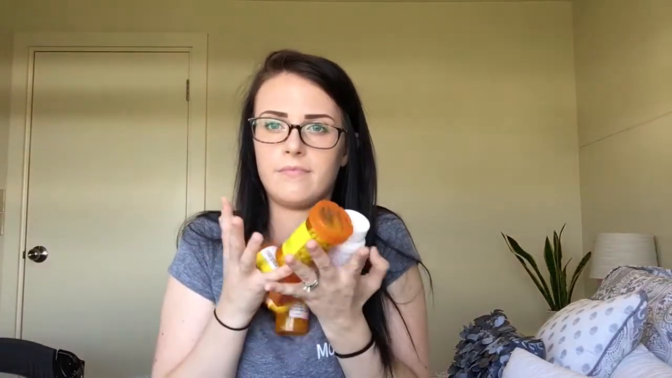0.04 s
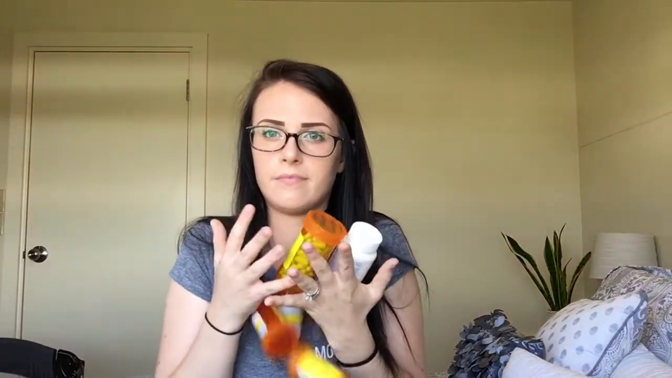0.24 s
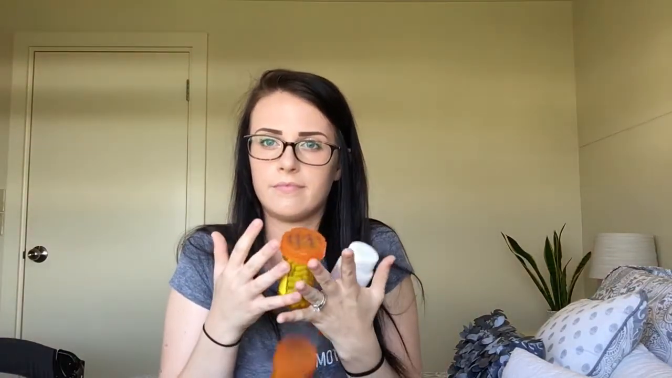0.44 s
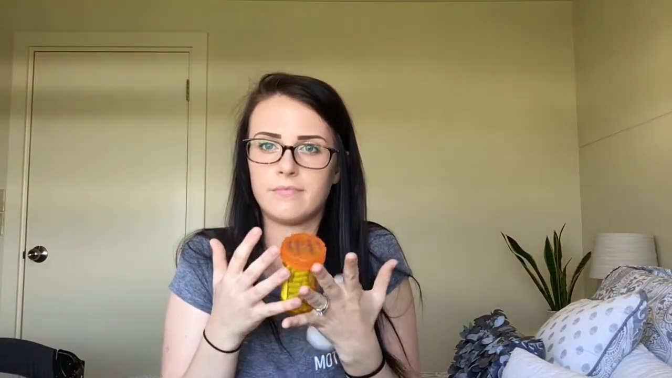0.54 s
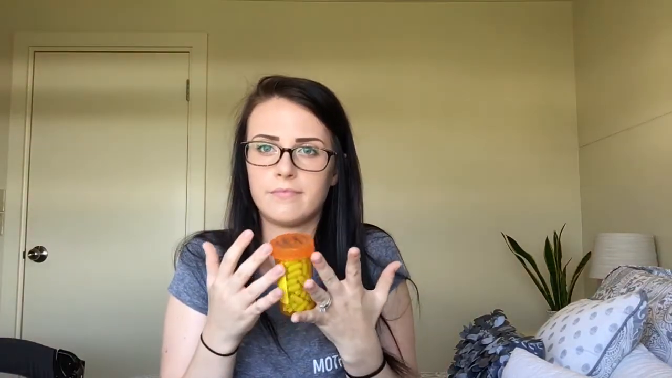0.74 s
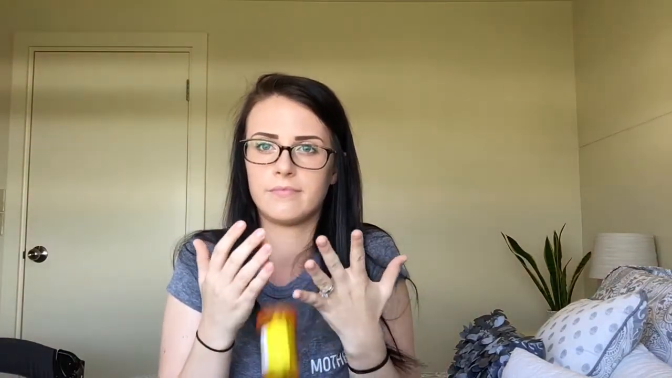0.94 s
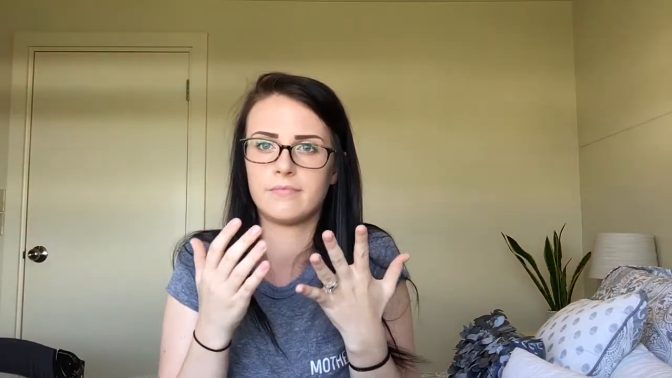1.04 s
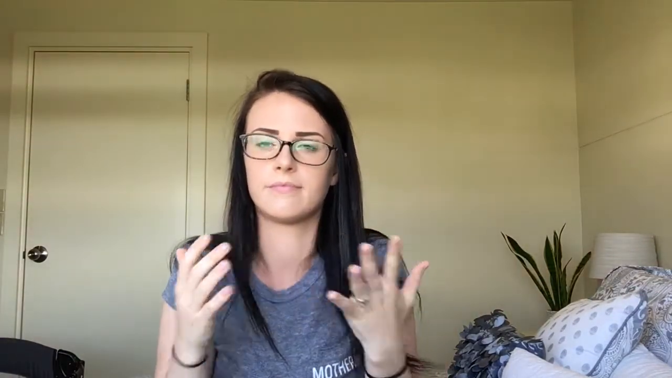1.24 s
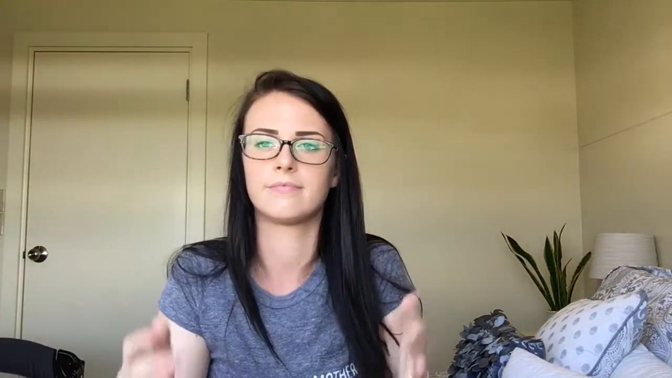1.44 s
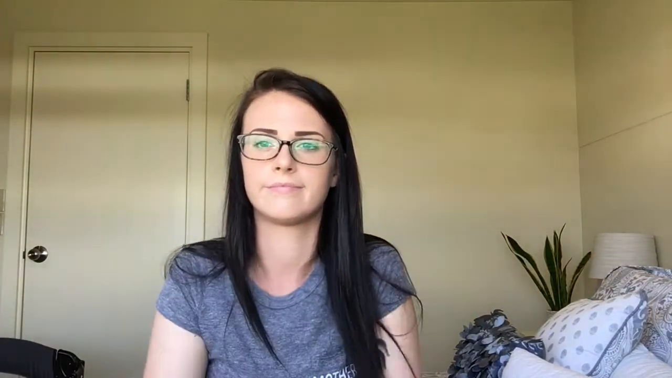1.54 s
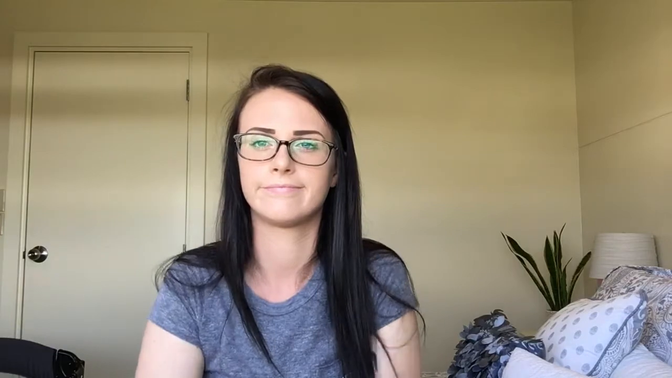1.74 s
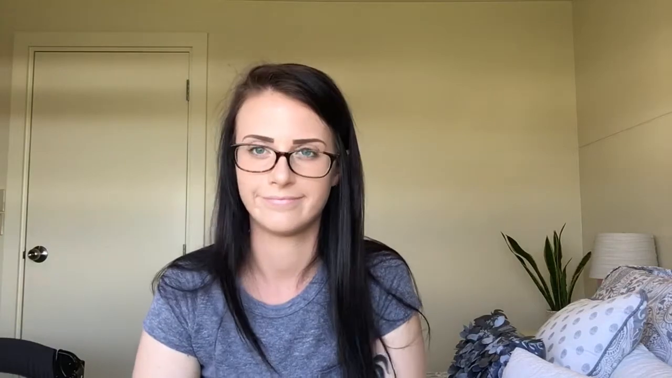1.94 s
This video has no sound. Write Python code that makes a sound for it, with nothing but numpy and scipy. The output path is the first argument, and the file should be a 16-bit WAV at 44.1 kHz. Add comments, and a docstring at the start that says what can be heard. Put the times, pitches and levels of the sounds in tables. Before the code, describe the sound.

Plastic pill bottles rattle and tumble, close and dry, in a quiet bedroom. Quick ticks clatter from 0 to 0.25 s, with a soft low thump at 0.23. Bursts of shaken pills follow at 0.3, 0.5 and 0.7, then hard clacks at 0.92 and the loudest knock near 1.17. The rattle dies by 1.5; soft thumps and a small rattle come around 1.7, faint ticks until 1.95, over faint room hum.

```python
"""Pill bottles tumbling onto a lap

Plastic pill bottles slip from a pair of hands and tumble onto a lap and each other in a quiet bedroom.
Each jolt throws a shower of random impacts, played as ringing wall modes with contact noise.
Between jolts sparser-sounding trickles follow a level curve, and single ticks are a crack and a short ring.
Soft thumps are low sines with dull noise; a faint hum and room noise, both filtered noise, lie underneath."""
import sys
import numpy as np
from scipy import signal
from scipy.fft import rfft, irfft
from scipy.io import wavfile

SR = 44100
rng = np.random.default_rng(int(sys.argv[2]) if len(sys.argv) > 2 else 0)


def transcribe(u):
    """Save the signal u as a 16-bit wav file named by the first command-line argument.

    u: samples, shape (n,) or (channels, n), limited to [-1, 1]; the rate is SR.
    q: integer samples, one column per channel.
    """
    v = np.clip(np.atleast_2d(u).T, -1, 1)
    q = np.round(v * 32767).astype(np.int16)
    wavfile.write(sys.argv[1], SR, q)


def gain_from_db(level_db):
    """Turn a decibel level (scalar or array-like) into a linear amplitude factor."""
    decades = np.asarray(level_db, float) / 20
    return 10 ** decades


N = 88200  # two seconds


def evened(x):
    """Scales a sound to mean power 1."""
    return x / np.sqrt(np.mean(x ** 2) + 1e-20)


def read(points, hz):
    """Reads a (frequency [Hz], value) table along a logarithmic frequency axis."""
    f, value = np.transpose(points)
    return np.interp(np.log(hz + 1), np.log(f + 1), value)


def add(mix, s, sound):
    """Lays a sound into the mix from s seconds on."""
    part = mix[round(s * SR):][:len(sound)]
    part += sound[:len(part)]


def butter_filter(x, order, hz, kind):
    """A Butterworth filter."""
    return signal.sosfilt(signal.butter(order, hz, kind, fs=SR, output="sos"), x)


def coloured(x, points):
    """Weights the spectrum of x by a (frequency [Hz], level [dB]) table."""
    hz = np.fft.rfftfreq(len(x), 1 / SR)
    return irfft(rfft(x) * gain_from_db(read(points, hz)), len(x))


def resonate(x, hz, width_hz):
    """A resonance of gain 1, fixed or moving: shifts hz down to zero, smooths, and shifts back."""
    turn = np.exp(2j * np.pi * np.cumsum(hz * np.ones(len(x))) / SR)
    r = np.exp(-np.pi * width_hz / SR)
    smooth = signal.lfilter([1 - r], [1, -r], x / turn)
    return 2 * (turn * smooth).real


def shelf(x, treble_db):
    """Lifts or lowers the treble above a split at 5600 Hz."""
    low = butter_filter(x, 2, 5600, "low")
    high = butter_filter(x, 2, 5600, "high")
    return low - gain_from_db(treble_db) * high  # the two bands meet in opposite phase


def air():
    """Room noise as coloured noise, and a wavering hum as noise through narrow resonances."""
    # spectrum of the room noise: (frequency [Hz], relative level [dB])
    air_spectrum = [(20, -22.5), (50, -22), (90, -12.5), (280, -5.5), (450, -16.5), (610, -7), (900, -18.5),
                    (2500, -27.5), (6000, -43.5), (16000, -40.5)]
    # hum bands: (frequency [Hz], width [Hz], level [dB])
    hum_bands = [(56.6, 8.2, -60), (117.8, 8.5, -61.5)]
    hum = np.zeros(N)
    for hz, width_hz, db in hum_bands:
        hum += gain_from_db(db) * evened(resonate(rng.standard_normal(N), hz, width_hz))
    noise = evened(coloured(rng.standard_normal(N), air_spectrum))
    return gain_from_db(-55.5) * noise + hum


def room(x):
    """Sparse echoes off the bedroom, each band dying at its own speed."""
    # decay of the room: (frequency [Hz], t60 [s])
    room_decay = [(300, 0.24), (1000, 0.2), (3000, 0.24), (6000, 0.087), (14000, 0.037)]
    echoes = np.zeros(SR // 2)
    at = np.arange(150, len(echoes) - 20, 20)
    # one echo of random sign somewhere in each 20 samples
    echoes[at + rng.integers(0, 20, len(at))] = rng.choice([-1., 1.], len(at))
    hz, t, bands = signal.stft(echoes, SR, nperseg=128)
    decay = gain_from_db(-60 * t / read(room_decay, hz)[:, None])
    tail = signal.istft(bands * decay, SR, nperseg=128)[1]
    return signal.fftconvolve(x, tail / np.linalg.norm(tail))[:N]


def thump(s, level_db, hz, t60, puff_db):
    """A soft thump: a low sine push with a dull puff of noise, swelling in and dying away together."""
    rise_s = 0.02
    t = np.arange(12000) / SR
    puff = evened(butter_filter(rng.standard_normal(len(t)), 2, (80, 500), "band"))
    shape = (1 - np.exp(-t / rise_s)) ** 2 * gain_from_db(level_db - 60 * t / t60)
    return s, shape * (2 * np.sin(2 * np.pi * hz * t) + gain_from_db(puff_db) * puff)


def crack(t, t60):
    """A short burst of contact noise, coloured and decaying."""
    # spectrum of plastic contact: (frequency [Hz], relative level [dB])
    crack_spectrum = [(180, -59.5), (300, -10), (1400, -12), (1550, -1), (4170, -22.5), (13300, -33.5),
                      (15700, -38.5), (16500, -57)]
    noise = evened(coloured(rng.standard_normal(len(t)), crack_spectrum))
    return noise * gain_from_db(-60 * t / t60)


def pill_taps(count):
    """Sounds of one pill meeting the wall at different spots: the modes in other shares, and a crack."""
    # bottle wall modes: (frequency [Hz], relative level [dB], t60 [s])
    wall_modes = [(428, -23, 0.02), (950, -2.5, 0.023), (1313, 1, 0.0253), (1540, 5.5, 0.014),
                  (1862, -3.5, 0.036), (2402, 7, 0.011), (2920, 3, 0.01), (3553, 0.5, 0.0086),
                  (4100, 0.5, 0.014), (5470, 5.5, 0.0024)]
    share_spread_db, pitch_spread = 4, 0.07  # pitch spread as a fraction
    crack_db, crack_t60 = 8, 0.0035
    t = np.arange(2000) / SR
    hz, db, t60 = np.transpose(wall_modes)[:, :, None]
    taps = []
    for _ in range(count):
        share, shift = rng.standard_normal((2, len(wall_modes), 1))
        decay = gain_from_db(db + share_spread_db * share - 60 * t / t60)
        modes = decay * np.sin(2 * np.pi * hz * (1 + pitch_spread * shift) * t)
        taps.append(evened(modes.sum(0) + gain_from_db(crack_db) * crack(t, crack_t60)))
    return taps


def hits(length, per_s, spread_db):
    """Random moments, sizes and signs of pill impacts, mean power 1."""
    spread = np.minimum(rng.exponential(1, length), 3.5)  # capped, so that no impact is huge
    size = gain_from_db(spread_db * spread) * rng.choice([-1, 1], length)
    return evened(size * (rng.random(length) < per_s / SR))


def rattle(force, taps):
    """Every impact plays one of the taps, picked at random."""
    spot = rng.integers(0, len(taps), len(force))
    sound = np.zeros(len(force))
    for k, tap in enumerate(taps):
        sound += signal.oaconvolve(force * (spot == k), tap)[:len(force)]
    return sound / np.sqrt(len(taps[0]))


def hollow(force, hz):
    """The air and wall of a bottle ringing in one steep band: two equal resonances in a row."""
    width_hz = 370  # of each resonance
    ring = resonate(resonate(force, hz, width_hz), hz, width_hz)
    return ring * np.sqrt(SR / (np.pi * width_hz))  # makes up for the narrow band


def trickle(taps):
    """Pills sliding and settling as the bottles turn: steady random impacts under moving levels."""
    # course of the trickle: (time [s], level [dB], treble [dB])
    course = [(0, -28, -4.5), (.07, -38, -9), (.15, -32.5, 2), (.4, -39.5, 14), (.47, -32.5, 0.5),
              (.6, -44, 14), (.64, -34, 5.5), (.67, -40.5, 8.5), (.76, -37, 0), (0.871, -34.5, 14),
              (.91, -37.5, 6), (.96, -32.5, 19.5), (1.05, -35, 2.5), (1.12, -47, 7), (1.2, -31, 12),
              (1.25, -29.5, 0.5), (1.351, -37, -3), (1.5, -54, -23), (1.598, -69, 2.5), (1.69, -66.5, 4.5),
              (1.799, -42.5, 6.5), (1.9, -59.5, 2), (1.95, -53.5, -1), (2, -74, -5)]
    # hollow bottle ring, held until the next row: (time [s], frequency [Hz], ring level [dB])
    hollow_rows = [(0, 1540, -7.5), (.28, 1460, -5), (.55, 2280, 1.5), (0.819, 1378, -5),
                   (1.061, 1140, -10), (1.199, 1544, -7.5), (1.399, 2140, -8.5), (1.791, 1520, -8)]
    s, level_db, treble_db = np.transpose(course)
    at, hz, ring_db = np.transpose(hollow_rows)
    t = np.arange(N) / SR
    force = hits(N, per_s=3000, spread_db=4.1)
    row = np.maximum(np.searchsorted(at, t) - 1, 0)
    ring = gain_from_db(ring_db[row]) * hollow(force, hz[row])
    pills = shelf(rattle(force, taps), np.interp(t, s, treble_db))
    return gain_from_db(np.interp(t, s, level_db)) * (pills + ring)


def tick(s, level_db, ring_hz, ring_t60, treble_db):
    """One pill: a crack of contact noise and a short decaying ring."""
    t = np.arange(2500) / SR
    ring = np.sin(2 * np.pi * ring_hz * t) * gain_from_db(-60 * t / ring_t60)
    contact = gain_from_db(-3) * shelf(crack(t, t60=0.012), treble_db)
    return s, gain_from_db(level_db) * (ring + contact)


def jolt(taps, s, level_db, ring_hz, hold_s, ring_db, treble_db):
    """A shower of pills that holds, then settles; the bottle rings along."""
    settle_t60 = 0.076
    t = np.arange(12000) / SR
    settle = gain_from_db(-60 * np.maximum(t - hold_s, 0) / settle_t60)
    force = hits(len(t), per_s=3600, spread_db=4.0) * settle
    force[0] = gain_from_db(13.5)  # the bottle's own knock opens each shower
    ring = gain_from_db(ring_db) * hollow(force, ring_hz)
    return s, gain_from_db(level_db) * (shelf(rattle(force, taps), treble_db) + ring)


def scene():
    """Pills close to the microphone, their echo in the room, the air of the room, and thumps."""
    # jolts that throw the pills:
    # (time [s], level [dB], wall ring [Hz], shower hold [s], ring level [dB], treble [dB])
    jolt_rows = [(.234, -36, 2810, 0.009, 9.5, 28), (0.323, -25.5, 1540, 0.0046, 7.5, 9.5),
                 (0.502, -31, 1870, 0.02, 0, -22), (0.506, -17.5, 1800, 0.0023, -5.5, 12),
                 (0.606, -35.5, 2590, 0.01, 12, 15.5), (0.688, -23, 2160, 0.02, -9.5, 7),
                 (0.698, -26.5, 1267, 0.028, 12, 5), (0.696, -32, 730, 0.017, 12, 1),
                 (0.747, -36.5, 1100, 0.015, 14.5, 11), (0.918, -17, 950, 0.0016, 1, 12),
                 (0.925, -15, 4100, 0.0026, 4, 14), (0.966, -22.5, 1410, 0.013, 0.5, 9.5),
                 (1.07, -34.5, 1030, 0.036, 5, 3), (1.126, -23.5, 950, 0.026, 3.5, 14.5),
                 (1.14, -14.5, 1300, 0.037, -5, 4), (1.165, -25, 1860, 0.018, 6.5, 9.5),
                 (1.738, -42, 1130, 0.0045, 6, 18), (1.747, -37.5, 1770, 0.02, -1.5, 13),
                 (1.754, -42, 2400, 0.0089, 4, 3.5)]
    # single pill ticks: (time [s], level [dB], ring [Hz], ring t60 [s], treble [dB])
    tick_rows = [(0.021, -22, 706, 0.015, -16), (0.083, -18.5, 2340, 0.02, -12),
                 (0.107, -17, 1800, 0.012, 7), (0.148, -23.5, 2320, 0.017, -1),
                 (0.16, -18, 660, 0.014, -14), (0.169, -14, 830, 0.0061, 2), (0.185, -18, 2460, 0.016, 6),
                 (0.204, -16, 3680, .012, 4), (0.211, -20.5, 2500, 0.014, -21),
                 (0.225, -23, 2700, 0.0095, -13), (0.456, -17, 900, 0.013, -2), (0.578, -27, 2270, .01, 10),
                 (0.681, -14.5, 1790, 0.0031, -25.5), (.791, -29, 2100, .006, 4),
                 (0.849, -22.5, 3600, 0.0054, -5), (.917, -8, 2030, 0.023, -5),
                 (.974, -13.5, 1370, 0.038, -9.5), (1.097, -28.5, 1230, 0.012, 21.5),
                 (1.171, -2, 1830, .016, 0), (1.194, -13, 1420, 0.026, -1), (1.29, -21.5, 3340, 0.013, -5),
                 (1.439, -30, 2100, .016, -15), (1.470, -32, 2430, .006, 5), (1.503, -42, 2500, .005, 5),
                 (1.697, -43, 1500, .006, -20), (1.752, -22, 1350, .014, -5), (1.822, -36, 1550, .025, -8),
                 (1.912, -32.5, 2770, 0.011, 6.5), (1.933, -38, 2480, 0.011, 2)]
    # soft thumps: (time [s], level [dB], pitch [Hz], t60 [s], puff level [dB])
    thump_rows = [(0.23, -9, 52.7, 0.061, -1.5), (0.679, -32, 67, 0.19, 8), (1.176, -38.5, 61.6, 0.15, -15),
                  (1.689, -24, 110, 0.16, -3), (1.722, -24, 51.2, 0.13, 3.5), (1.78, -37, 60, 0.18, -2.5)]
    taps = pill_taps(count=32)
    near = trickle(taps)
    for row in jolt_rows:
        add(near, *jolt(taps, *row))
    for row in tick_rows:
        add(near, *tick(*row))
    near = butter_filter(near, 2, 399, "high")  # little sounds below this
    mix = near + gain_from_db(-15) * room(near) + air()
    for row in thump_rows:
        add(mix, *thump(*row))
    return mix[None]


def low_pass(x):
    """A steep low-pass: nothing sounds above 16850 Hz."""
    return signal.sosfilt(signal.butter(12, 16850, fs=SR, output="sos"), x)


def record(dry):
    """The input rounds off the highest peaks, then limits the band."""
    ceiling = gain_from_db(-1)
    rounded = ceiling * np.tanh(dry / ceiling)
    low_cut = signal.butter(3, 30, "high", fs=SR, output="sos")
    top_cut = signal.cheby2(12, 35, 16200, fs=SR, output="sos")
    return low_pass(signal.sosfilt(np.vstack([low_cut, top_cut]), rounded))


dry = scene()
out = record(dry)
transcribe(out)
```